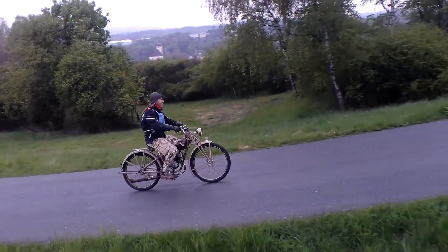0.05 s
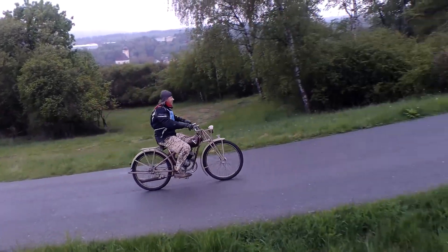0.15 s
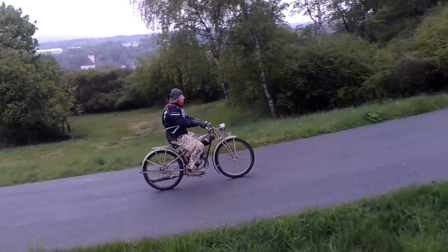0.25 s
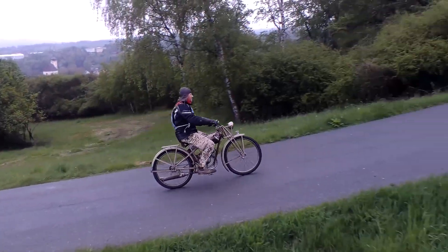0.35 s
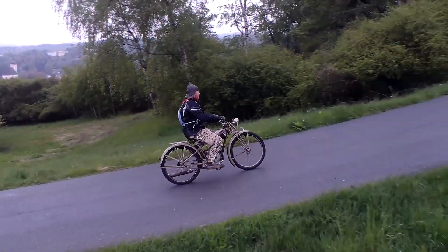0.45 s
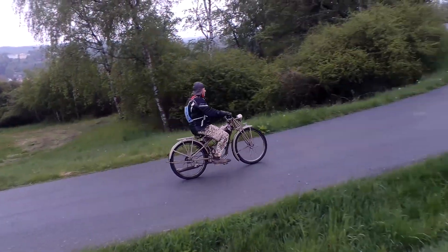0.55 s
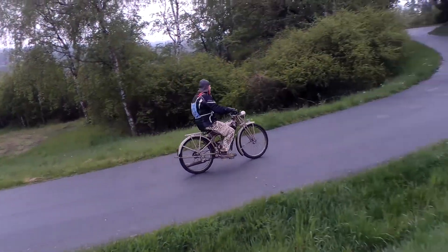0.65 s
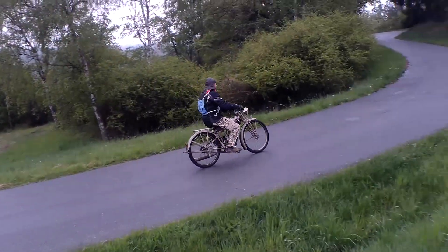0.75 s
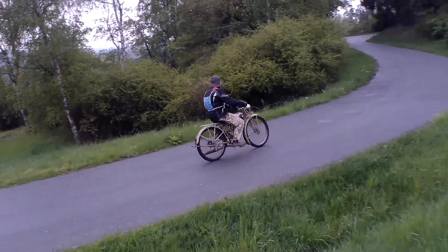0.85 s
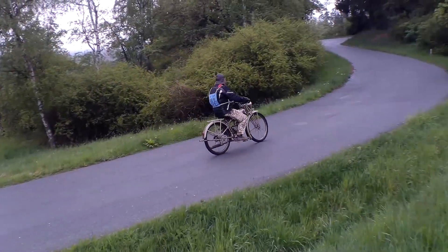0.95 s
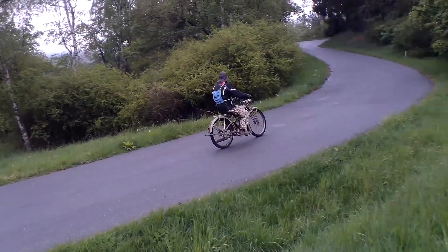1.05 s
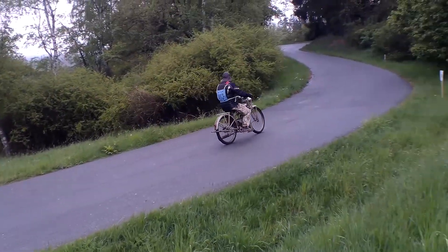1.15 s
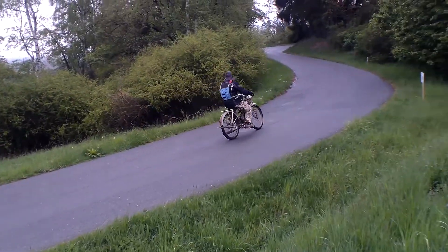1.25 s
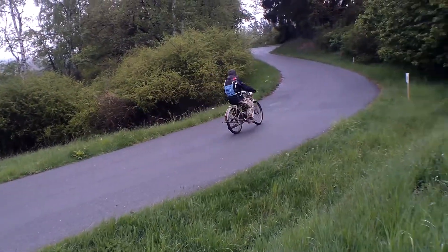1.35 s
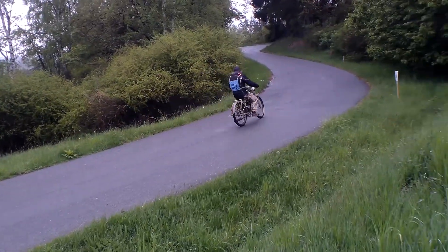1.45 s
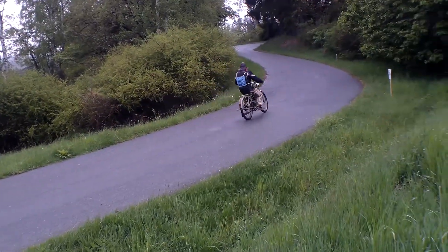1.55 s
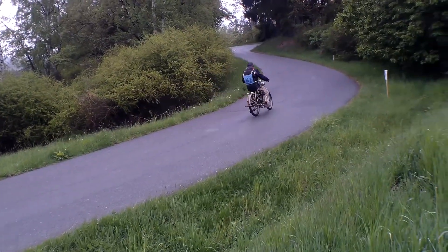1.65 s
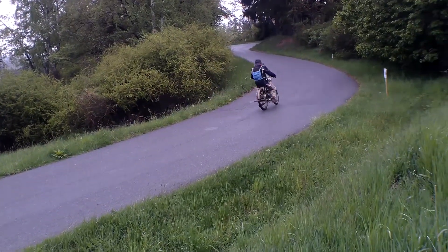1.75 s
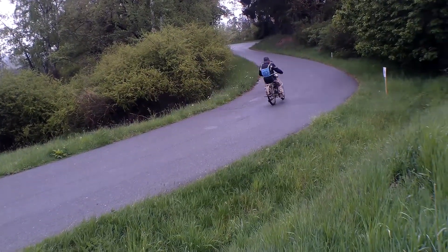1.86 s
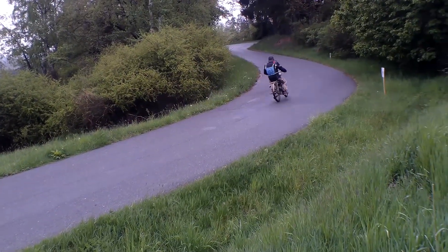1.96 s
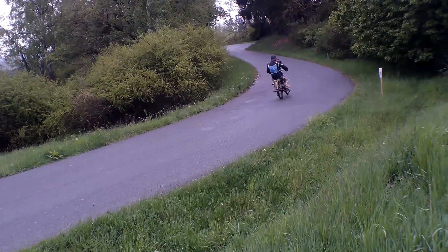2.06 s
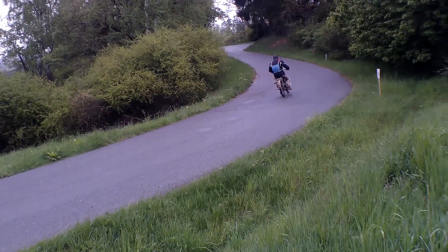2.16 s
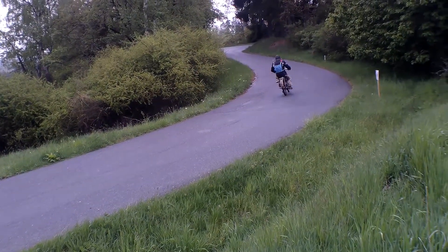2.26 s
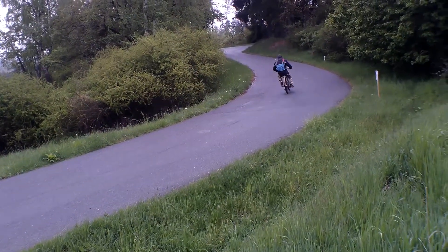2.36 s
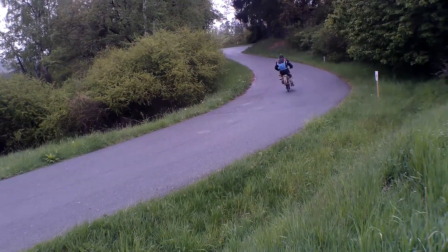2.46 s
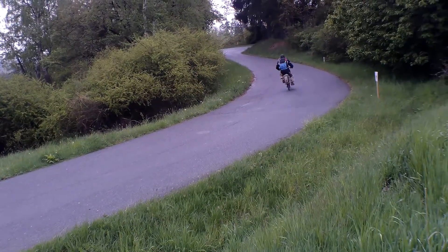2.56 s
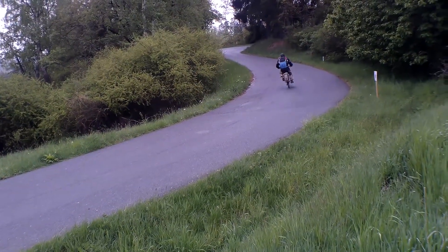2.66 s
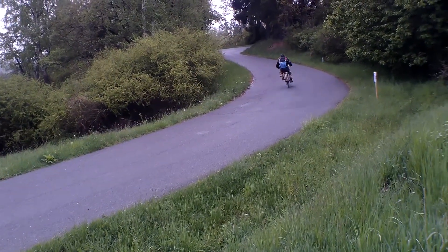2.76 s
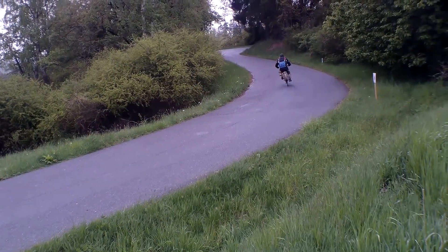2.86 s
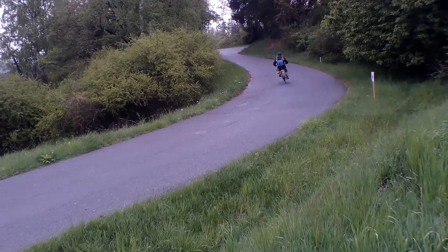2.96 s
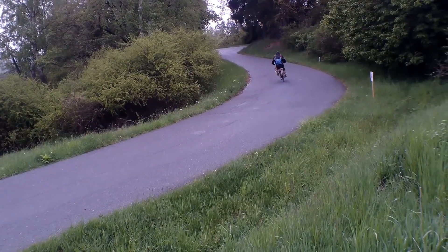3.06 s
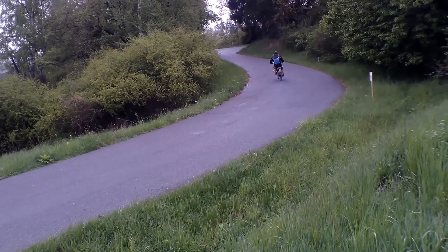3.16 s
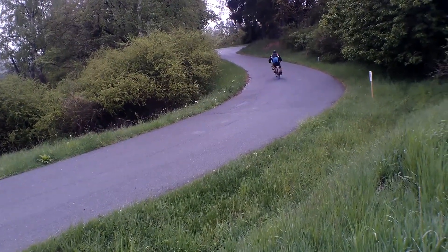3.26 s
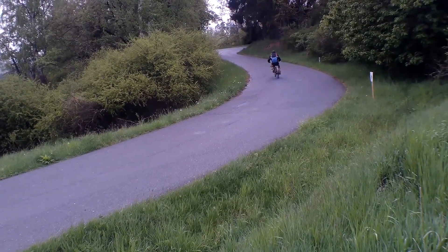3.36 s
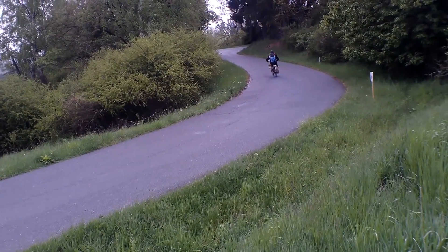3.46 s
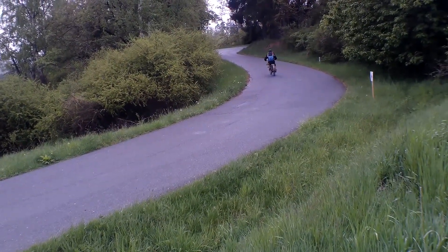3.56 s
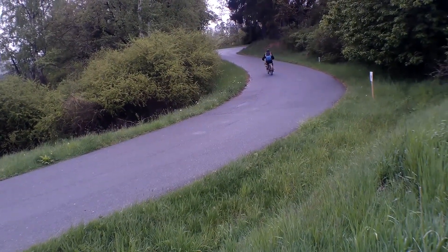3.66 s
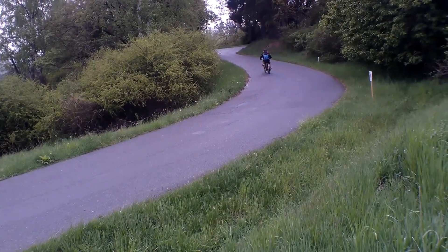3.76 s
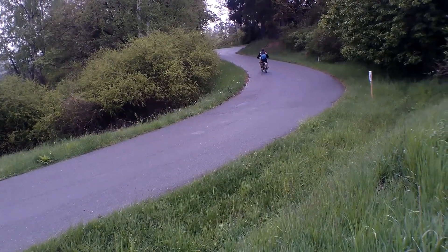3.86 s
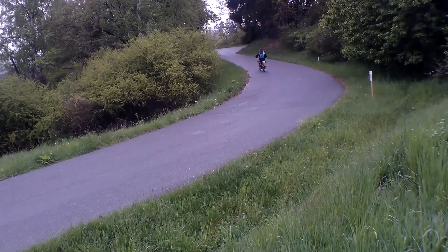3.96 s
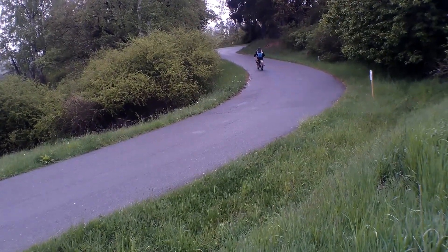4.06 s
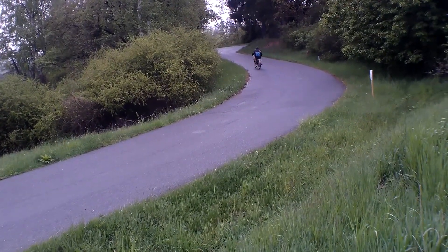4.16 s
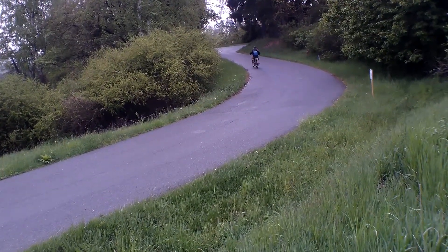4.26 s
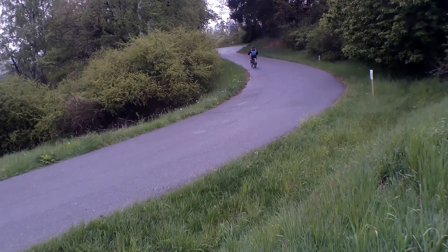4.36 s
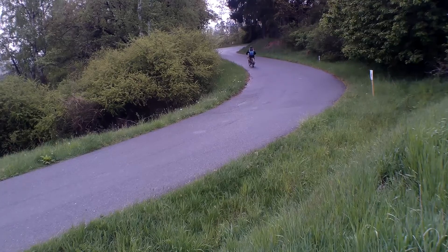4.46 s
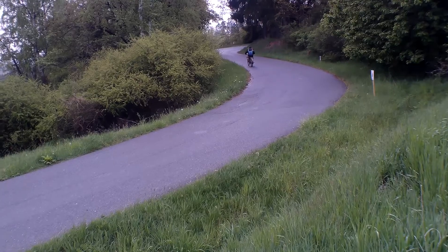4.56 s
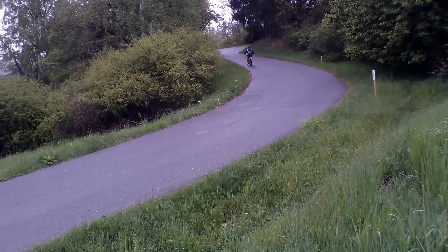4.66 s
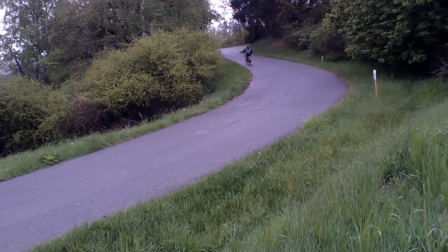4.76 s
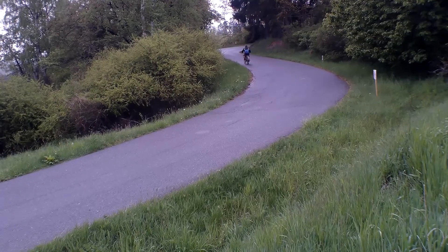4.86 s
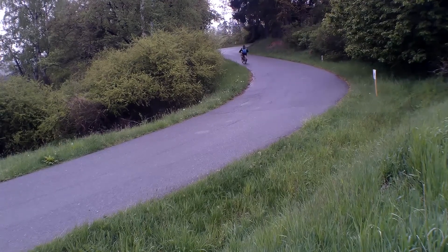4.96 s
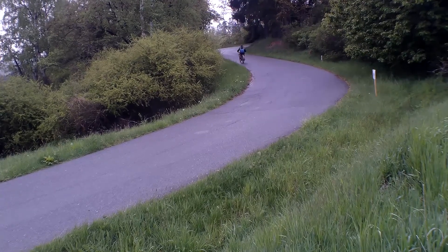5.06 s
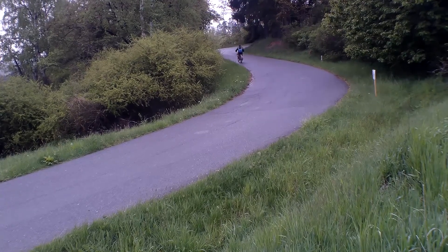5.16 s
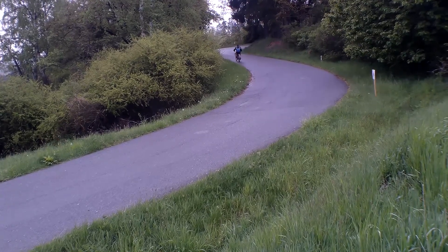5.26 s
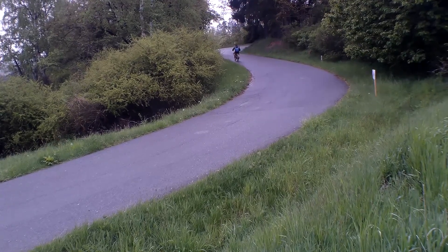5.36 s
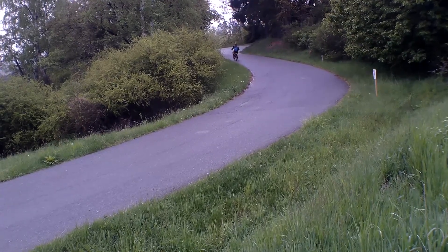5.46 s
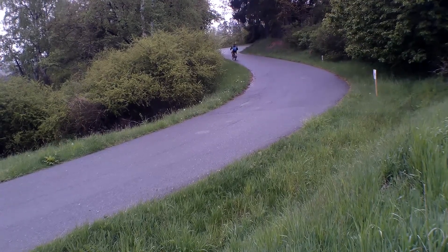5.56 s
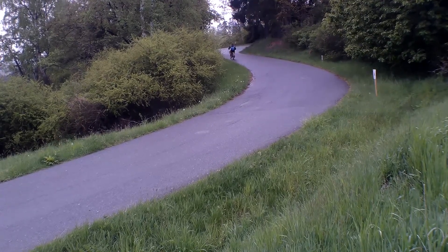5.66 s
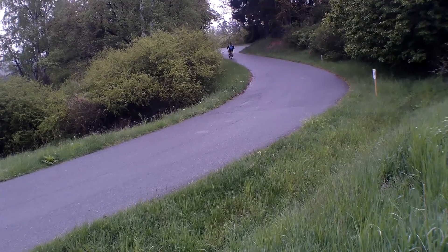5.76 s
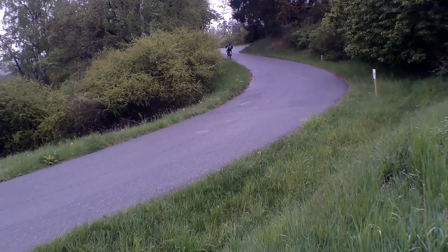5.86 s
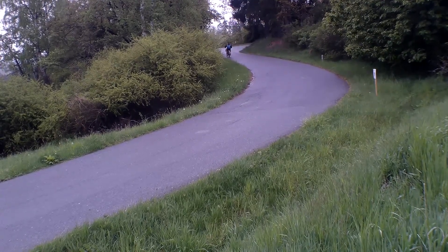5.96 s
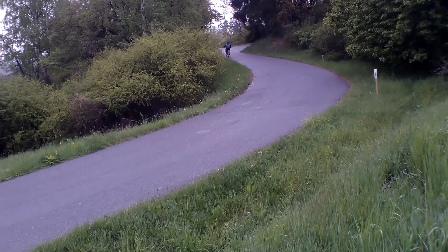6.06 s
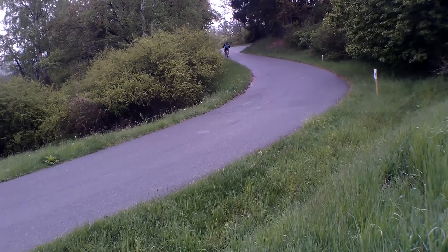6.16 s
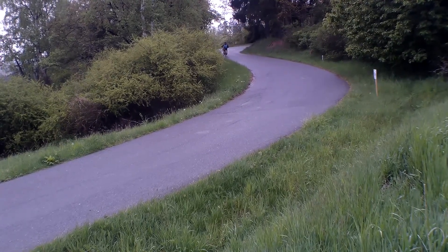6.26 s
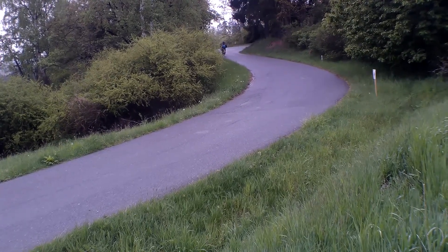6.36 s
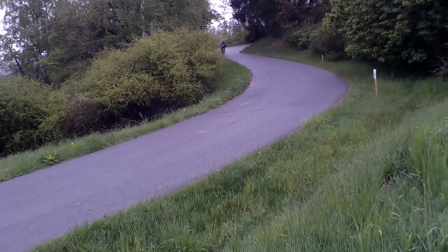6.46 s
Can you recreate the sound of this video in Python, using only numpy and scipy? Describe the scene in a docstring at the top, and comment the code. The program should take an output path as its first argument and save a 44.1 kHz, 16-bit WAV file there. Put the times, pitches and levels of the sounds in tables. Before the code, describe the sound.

An old two-stroke motorcycle is already close at the start and passes the roadside listener at about 0.4 seconds. Its rapid firing makes a steady buzzing drone, with ringing metallic clatter and a light chain and tyre hiss. The pitch sags slightly around 1 second, then creeps back up. The clatter and hiss weaken by 2 seconds as the bike climbs away, but the raspy exhaust bark stays strong until about 4 seconds. After that the engine fades and dulls, leaving a faint distant drone from 6 seconds to the end at about 6.5. Sharp little ticks of grit come irregularly between 0.8 and 4.1 seconds, strongest in the first two seconds. A small bird repeats quick, thin, very high twitters throughout, clearest in the first second, over a soft, even rush of open country air.

```python
"""An old single-cylinder two-stroke motorcycle clatters past side-on and climbs away up a country road.
Each crank turn gives an intake gulp, a ringing knock and an exhaust pop; piston slap rings the fins
and the chain hisses. As the bike turns tail-on the pop closes on the knock and the bark swells in the
tailpipe's beam, then bushes shade its rasp. Grit ticks; a small bird twitters very high over soft air."""
import sys
import numpy as np
from scipy import signal
from scipy.fft import rfft, irfft
from scipy.io import wavfile
from scipy.ndimage import uniform_filter1d

SR = 44100
rng = np.random.default_rng(int(sys.argv[2]) if len(sys.argv) > 2 else 0)


def transcribe(u):
    """Save the signal u as a 16-bit wav file named by the first command-line argument.

    u: samples, shape (n,) or (channels, n), limited to [-1, 1]; the rate is SR.
    q: integer samples, one column per channel.
    """
    v = np.clip(np.atleast_2d(u).T, -1, 1)
    q = np.round(v * 32767).astype(np.int16)
    wavfile.write(sys.argv[1], SR, q)


N = 287532
TIME_S = np.arange(N) / SR


def from_db(db):
    """Decibels to gain."""
    return 10 ** (np.asarray(db) / 20)


def unit_rms(x):
    """Scale to rms 1."""
    return x / np.sqrt(np.mean(x ** 2) + 1e-20)


def steady(x, size=6000):
    """Even the slow level to rms 1; each firing keeps its shape."""
    return x / np.sqrt(uniform_filter1d(uniform_filter1d(x ** 2, size), size) + 1e-20)


def curve(rows):
    """Breakpoints (time_s, value) at every sample."""
    return np.interp(TIME_S, *np.transpose(rows))


def flutter(rate_hz):
    """Random wavering, spread about 1."""
    return np.interp(TIME_S * rate_hz, np.arange(1024), rng.standard_normal(1024))


def band(x, low_hz, high_hz):
    """Zero-phase band-pass: pulses stay in place."""
    return signal.sosfiltfilt(signal.butter(8, [low_hz, high_hz], "band", fs=SR, output="sos"), x)


def colour(x, spectrum, size=4096):
    """Minimum-phase filter from rows of (freq_hz, gain_db)."""
    hz, db = np.transpose(spectrum)
    grid_hz = np.maximum(np.arange(size // 2 + 1) * SR / size, 1)
    gain = from_db(np.interp(np.log(grid_hz), np.log(hz), db))
    cepstrum = irfft(np.log(gain))
    cepstrum[1:size // 2] *= 2
    cepstrum[size // 2 + 1:] = 0
    return signal.fftconvolve(x, irfft(np.exp(rfft(cepstrum))))[:N]


def resonance(x, hz, width_hz):
    """Two-pole resonance, peak gain 1."""
    r = np.exp(-np.pi * width_hz / SR)
    feedback = [1, -2 * r * np.cos(2 * np.pi * hz / SR), r * r]
    return signal.lfilter(np.array([1, 0, -1]) * (1 - r * r) / 2, feedback, x)


def clicks(turns, spread_db, jitter_s):
    """One impulse a turn, uneven in strength and timing; harmonics of height about 1."""
    whole_turns = np.arange(np.ceil(turns[0]), turns[-1])
    late, loud = rng.standard_normal((len(whole_turns), 2)).T
    at = np.clip(np.interp(whole_turns, turns, np.arange(N)) + jitter_s * SR * late, 0, N - 2)
    strength = from_db(spread_db * loud) * N / len(whole_turns) / 2
    out = np.zeros(N)
    out[at.astype(int)] = strength * (1 - at % 1)
    out[at.astype(int) + 1] = strength * (at % 1)
    return out


def bursts(turns, centre_turns, width_turns, floor, spread_db):
    """Noise that swells once a turn around one crank position."""
    position = turns - centre_turns + .5
    strength = from_db(spread_db * rng.standard_normal(1024))[np.floor(position).astype(int)]
    swell = np.exp(-.5 * ((position % 1 - .5) / width_turns) ** 2)
    return rng.standard_normal(N) * (floor + strength * swell)


# Open-air spectrum: freq_hz, gain_db
AIR_SPECTRUM = [(20, -5), (60, -7), (160, -1), (400, -2.5), (700, -1), (1100, -8), (1600, -2), (2300, -5.5),
                (3000, -10), (4000, -15), (4700, -17.5), (10000, -29), (11800, -38), (15700, -31)]


def country_air(level_db=-56):
    """The soft, even rush of open country."""
    return from_db(level_db) * unit_rms(colour(rng.standard_normal(N), AIR_SPECTRUM))


# Bird phrases: start_s, note_count, level_db
BIRD_PHRASES = [(0.082, 3, -39), (0.501, 3, -40), (0.651, 3, -44), (.89, 3, -45), (1.245, 3, -48),
                (1.64, 4, -49), (1.747, 4, -45.5), (2.132, 3, -53), (2.471, 4, -52), (2.879, 4, -51.5),
                (3.318, 4, -49), (3.733, 5, -50.5), (4.149, 3, -49.5), (4.633, 3, -49.5), (4.884, 5, -49),
                (5.383, 4, -49.5), (5.886, 4, -52.5), (6.232, 3, -53)]


def bird(top_hz=10150, fall_hz=1900, note_s=.013, spacing_s=.0163, warble_hz=260, jitter_s=.00067):
    """Quick runs of thin notes, each holding its pitch, then dropping."""
    out = np.zeros(N)
    along = np.linspace(0, 1, int(note_s * SR))
    for start_s, note_count, level_db in BIRD_PHRASES:
        for k, (late, loud, drop) in enumerate(rng.standard_normal((round(note_count), 3))):
            warble = unit_rms(uniform_filter1d(rng.standard_normal(len(along)), size=30))
            pitch_hz = top_hz - fall_hz * (1 + .5 * drop) * along ** 4 + warble_hz * warble
            note = np.sin(np.pi * along) * np.sin(2 * np.pi * np.cumsum(pitch_hz) / SR)
            at = int((start_s + k * spacing_s + jitter_s * late) * SR)
            out[at:at + len(note)] += from_db(level_db + 2 * loud) * note
    return out


# Sharp ticks: start_s, level_db, centre_hz
GRIT_TICKS = [(.824, -21, 10400), (.8854, -25, 9600), (1.4391, -26, 10000), (1.7814, -25, 9700),
              (1.846, -34, 8200), (2.7242, -34, 9800), (2.79, -39, 7000), (3.3184, -34, 10000),
              (3.5, -35, 8600), (4.1153, -27, 5300)]


def grit(decay_s=.00036, tail_s=.0056, tail_db=-13, width_hz=5000, cutoff_hz=10800):
    """Millisecond cracks with a short rattle, as of flung grit, each in one broad resonance."""
    out = np.zeros(N)
    age_s = np.arange(1024) / SR
    envelope = np.exp(-age_s / decay_s) + from_db(tail_db) * np.exp(-age_s / tail_s)
    for start_s, level_db, hz in GRIT_TICKS:
        grains = rng.standard_normal(len(age_s)) * envelope
        crack = resonance(resonance(grains, hz, width_hz), hz, width_hz)
        at = int(start_s * SR)
        out[at:at + len(crack)] += from_db(level_db) * crack / np.abs(crack).max()
    return signal.sosfilt(signal.butter(8, cutoff_hz, fs=SR, output="sos"), out)


# Chain and tyre hiss: freq_hz, gain_db
HISS_SPECTRUM = [(2500, 3.5), (4200, -13.5), (4750, -8.5), (5700, 0.5), (7300, 3), (8400, 5.5), (9200, 1.5),
                 (10200, 8.5), (10900, 1.5), (11800, -16), (14000, -10), (15700, -38)]
# Chain guard and spoke modes: freq_hz, width_hz, level_re_hiss_db
GUARD_MODES = [(4045, 90, -9), (5610, 130, -20), (8320, 98, -20)]


def chain(turns, surge_db=3, surge_hz=5, flutter_db=1, flutter_hz=18):
    """Chain and tyres hiss in time with the crank; the guard's faint rings come and go."""
    rush = bursts(turns, centre_turns=.025, width_turns=.08, floor=2.5, spread_db=5.5)
    rings = sum(from_db(db + surge_db * flutter(surge_hz)) * unit_rms(resonance(rush, hz, width_hz))
                for hz, width_hz, db in GUARD_MODES)
    hiss = unit_rms(colour(rush, HISS_SPECTRUM))
    return from_db(flutter_db * flutter(flutter_hz)) * hiss + rings


# Piston and port contacts: position_turns, gain_db
PISTON_SLAPS = [(-.16, -2.5), (-.03, 6), (0.07, -1), (0.32, 3.5)]
# Beamed cooling-fin modes: freq_hz, width_hz, gain_db, aim_deg, beam_deg
FIN_MODES = [(2880, 53, 7, -8, 13), (2037, 55, 12, 46.5, 11.7), (1800, 120, 0, 24, 20),
             (3940, 100, 0, 17, 13), (2670, 60, 4.5, 27, 12), (3506, 75, -6.5, 38, 32),
             (1567, 53, 5.5, 77.5, 7.1), (2095, 84, 4.5, 79, 4.8), (3060, 86, -5.5, 72, 19),
             (3960, 30, -10.5, 100, 23), (1090, 20, -10, 74, 18)]
# Broad rattle of the engine body: freq_hz, gain_db
BODY_SPECTRUM = [(100, -49), (400, -71.5), (750, -5.5), (1250, -10.5), (1700, -8.5), (2100, -14.5),
                 (2350, -8.5), (2700, -12), (3350, -11), (4050, -10), (4600, -32.5), (6000, -36.5)]


def clatter(turns, bearing_deg, loose_db=-7, body_db=-1, parts_db=-3, jitter_s=.00002, part_count=10):
    """Piston slap and loose rattle shake the barrel; each fin mode sounds as its beam sweeps past."""
    slap = unit_rms(sum(from_db(db) * clicks(turns - at, spread_db=.5, jitter_s=jitter_s)
                        for at, db in PISTON_SLAPS))
    loose = unit_rms(bursts(turns, centre_turns=.012, width_turns=.095, floor=.75, spread_db=3.5))
    # Small parts knock at the same positions every turn, giving the rattle a pitch.
    parts = unit_rms(sum((-1) ** k * clicks(turns - at, spread_db=3, jitter_s=jitter_s)
                         for k, at in enumerate(rng.random(part_count))))
    shake = slap + from_db(loose_db) * loose
    fins = np.zeros(N)
    for hz, width_hz, db, aim_deg, beam_deg in FIN_MODES:
        beam = np.exp(-.5 * ((bearing_deg - aim_deg) / beam_deg) ** 2)
        fins += from_db(db) * beam * unit_rms(resonance(shake, hz, width_hz))
    body = unit_rms(colour(loose + from_db(parts_db) * parts, BODY_SPECTRUM))
    return steady(from_db(body_db) * body + steady(fins))


# Intake gulp harmonics: order, gain_db
GULP_HARMONICS = [(1, -11), (2, -6), (3, 0), (4, -1), (5, -51)]
# Airbox and crankcase modes: freq_hz, width_hz, gain_db
AIRBOX_MODES = [(438, 8.3, -5), (562.5, 53, 2.5), (653, 270, -3.5), (1044, 88, -3), (1666, 450, -11.5),
                (2037, 29, 7), (2474, 140, -12.5), (3240, 23, -18.5), (3840, 24, -45)]


def intake(turns, gulp_lead_turns=.108, open_turns=.225):
    """The port opens softly, sucks, then shuts hard; both edges ring the airbox."""
    gulp = -sum(from_db(db) * np.cos(2 * np.pi * order * (turns + gulp_lead_turns))
                for order, db in GULP_HARMONICS)
    opens = clicks(turns + open_turns, spread_db=1, jitter_s=.00003)
    shuts = clicks(turns, spread_db=.5, jitter_s=.00002)
    edges = shuts - .33 * opens
    knock = sum(from_db(db) * resonance(edges, hz, width_hz) for hz, width_hz, db in AIRBOX_MODES)
    return gulp + knock


# Tailpipe mouth modes: freq_hz, width_hz, gain_db
TAILPIPE_MODES = [(1360, 88, -7), (1610, 137, 1), (2050, 147, -7.5), (2620, 200, -8.5)]


def tailpipe_rasp(turns, puff_db=4):
    """Each pop, with a puff of gas, rings the mouth of the tailpipe."""
    pops = clicks(turns, spread_db=1.2, jitter_s=.00002)
    puffs = bursts(turns, centre_turns=.01, width_turns=.03, floor=.05, spread_db=2)
    cracks = pops + from_db(puff_db) * puffs
    return sum(from_db(db) * (-1) ** k * resonance(cracks, hz, width_hz)
               for k, (hz, width_hz, db) in enumerate(TAILPIPE_MODES))


# Silencer response: freq_hz, gain_db
SILENCER_SPECTRUM = [(30, -21), (63, -5), (130, -1), (200, 3), (320, 1.5), (380, -12), (450, 6), (560, 5),
                     (780, 3), (1100, 5.5), (1300, -18), (1550, 0), (2000, -27), (4000, -15.5)]


def exhaust(turns, puff_db=6, puff_band_hz=(1200, 5000)):
    """A sharp pop and a puff of turbulent gas leave through the silencer each turn."""
    pops = clicks(turns, spread_db=.4, jitter_s=.000015)
    puffs = bursts(turns, centre_turns=.012, width_turns=.02, floor=.05, spread_db=2)
    return -colour(pops + from_db(puff_db) * band(puffs, *puff_band_hz), SILENCER_SPECTRUM)


def pass_gain(path, closest_s=.38, closest_m=4.79, speed_m_per_s=6.38):
    """Gain at the verge, set by distance, the tailpipe's aim in the bend and the bushes."""
    closest_db, loss_db_per_decade, aimed_gain_db, bush_loss_db = path
    distance_m = np.hypot(closest_m, speed_m_per_s * (TIME_S - closest_s))
    distance_loss_db = loss_db_per_decade * np.log10(distance_m / closest_m)
    aimed = np.interp(TIME_S, [1.19, 3.97, 6.03], [0, 1, 0])
    shaded = np.interp(TIME_S, [3.47, 5.64], [0, 1])
    return from_db(closest_db - distance_loss_db + aimed_gain_db * aimed - bush_loss_db * shaded)


# Engine speed, sagging on the slope, rising with the throttle: time_s, firing_hz
ENGINE_SPEED = [(0.0, 64.98), (0.4, 63.31), (0.48, 63.73), (0.94, 62.48), (1.07, 61.9), (1.82, 62.57),
                (1.88, 63.42), (2.26, 62.33), (2.44, 64.55), (2.54, 62.84), (2.77, 65.11), (2.86, 63.86),
                (3.81, 65.31), (4.09, 64.59), (4.29, 66.15), (5.03, 65.53), (5.09, 66.26), (6.52, 65.48)]
# Heading, 0 side-on to 90 tail-on: time_s, bearing_deg
HEADING = [(0, 0), (.25, 4), (.5, 21), (1, 46), (1.5, 60), (2, 68), (3, 74), (4.2, 85), (6.52, 85)]
# Clatter fade: time_s, gain_db
CLATTER_FADE = [(0.0, -33), (0.03, -34.5), (0.54, -37), (0.87, -36), (1.34, -37.5), (2.12, -44.5),
                (3.7, -43.5), (4.32, -55.5), (5.57, -54), (5.68, -61), (6.52, -60)]
# Path of each register to the verge: closest_db, loss_db_per_decade, aimed_gain_db, bush_loss_db
BOOM_PATH = (-41, 19.5, 2.5, 0)
HOLLOW_PATH = (-56.5, 52, -27, 0)
BARK_PATH = (-38.5, 19.5, 13.5, -1)
BITE_PATH = (-44, 27.5, 17, 4.5)
RASP_PATH = (-46, 20, 8, 23)
CHAIN_PATH = (-45.5, 25, 3, 1)


def motorcycle(start_turns=-.815, hunt_turns=.014, hunt_hz=11, clatter_trim_db=-2, tail_on_pop_db=-7.5):
    """Engine and tailpipe sound apart; their lag shrinks as the tail swings towards the verge."""
    bearing_deg = curve(HEADING)
    tail_on = np.sin(np.radians(bearing_deg))
    pipe_turns = start_turns + np.cumsum(curve(ENGINE_SPEED)) / SR + hunt_turns * flutter(hunt_hz)
    lag_turns = .4 - .23 * tail_on
    crank_turns = pipe_turns + lag_turns
    pulses = from_db(tail_on_pop_db * tail_on) * exhaust(pipe_turns) + intake(crank_turns)
    registers = [(BOOM_PATH, 40, 350), (HOLLOW_PATH, 360, 405),
                 (BARK_PATH, 412, 830), (BITE_PATH, 831, 1313)]
    voice = sum(pass_gain(path) * steady(band(pulses, low_hz, high_hz))
                for path, low_hz, high_hz in registers)
    rattle = from_db(curve(CLATTER_FADE) + clatter_trim_db) * clatter(crank_turns, bearing_deg)
    hiss = pass_gain(CHAIN_PATH) * chain(crank_turns)
    rasp = pass_gain(RASP_PATH) * steady(tailpipe_rasp(pipe_turns))
    return voice + rattle + hiss + rasp


def scene():
    """The bike in open country, mono."""
    return (country_air() + motorcycle() + bird() + grit())[None]


def record(dry, cutoff_hz=15700):
    """Steep low-pass."""
    return signal.sosfilt(signal.ellip(10, .1, 80, cutoff_hz, fs=SR, output="sos"), dry)


dry = scene()
out = record(dry)
transcribe(out)
```